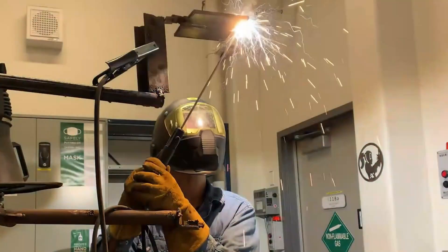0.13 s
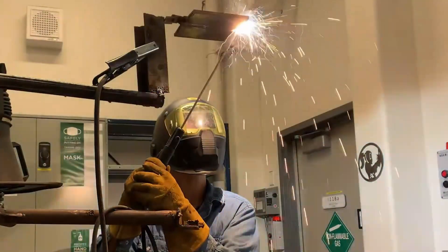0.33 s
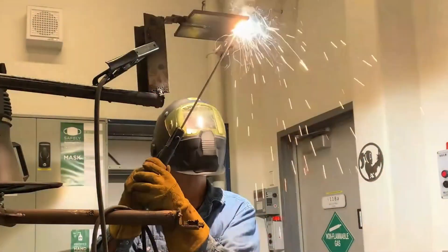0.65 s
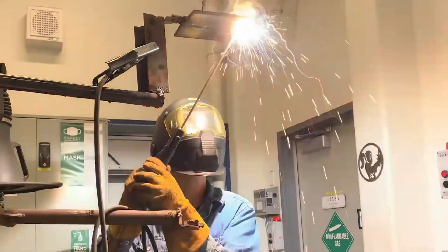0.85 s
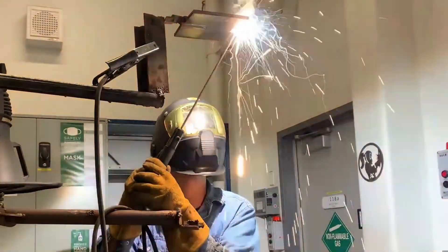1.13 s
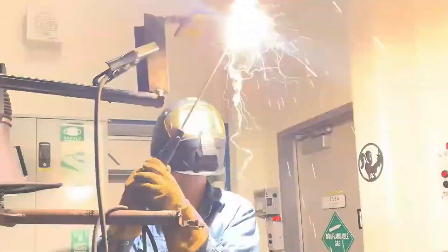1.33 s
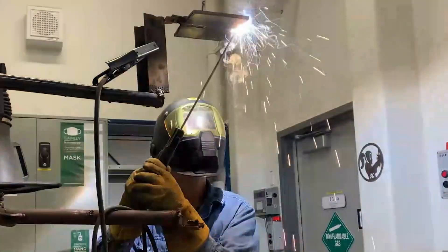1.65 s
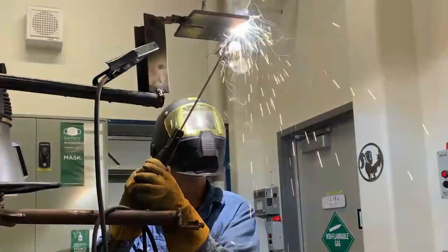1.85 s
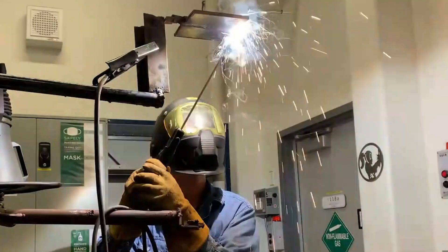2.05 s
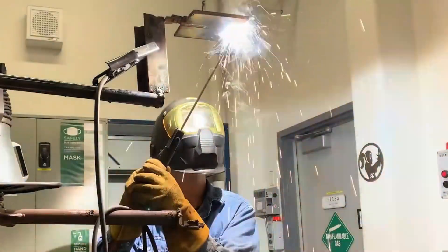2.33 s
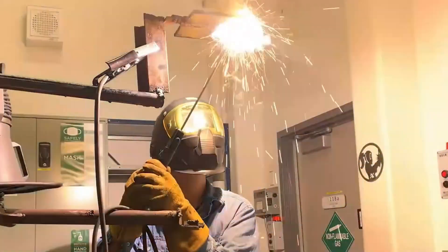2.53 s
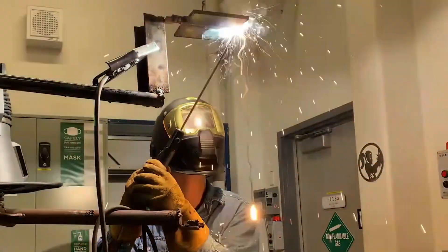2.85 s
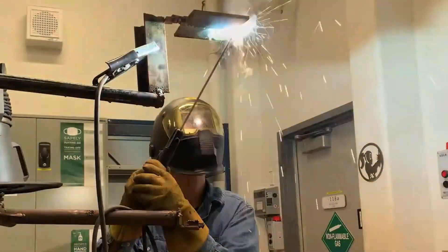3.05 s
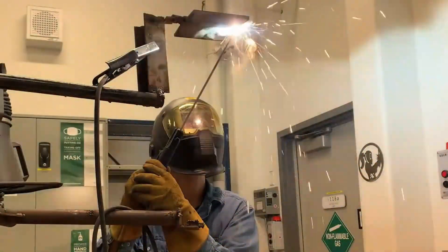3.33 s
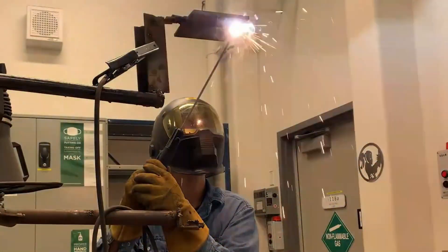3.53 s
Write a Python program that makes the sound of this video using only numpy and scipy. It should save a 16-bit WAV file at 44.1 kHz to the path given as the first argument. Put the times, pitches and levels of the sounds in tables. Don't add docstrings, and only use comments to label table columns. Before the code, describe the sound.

A stick welding arc sizzles throughout with bright crackle and irregular dry snaps. Spatter hisses at 0.4 s, and snaps cluster at 0.8-0.95 s. It thins around 1.2-1.9 s, with duller pops, before a heavy pop rings the steel plate at 2.0 s. Pops and tiny clinks come at 2.6 s, strong hiss at 2.7 s, a brief dip, then a sharp crack at 3.04 s and continued crackling. Short booth echo, low ventilation rumble.

```python
import sys
import numpy as np
from scipy import signal
from scipy.io import wavfile
from scipy.ndimage import uniform_filter1d

SR = 44100
rng = np.random.default_rng(int(sys.argv[2]) if len(sys.argv) > 2 else 0)


def boost(x):
    u = np.asarray(x, float) / 20
    return 10 ** u


def wav_record(signal):
    frames = np.transpose(np.atleast_2d(signal))
    bounded = np.clip(frames, -1, 1)
    quanta = np.round(bounded * 32767).astype(np.int16)
    wavfile.write(sys.argv[1], SR, quanta)


N = 163170


def evened(x):
    return x / np.sqrt(np.mean(x ** 2) + 1e-20)


def read(points, hz):
    f, value = np.transpose(points)
    return np.interp(np.log(hz + 1), np.log(f + 1), value)


def add(mix, s, sound):
    part = mix[round(s * SR):][:len(sound)]
    part += sound[:len(part)]


def colour(points, size=4096):
    hz = abs(np.fft.fftfreq(size, 1 / SR))
    log_gain = np.log(boost(read(points, hz)))
    taps = np.fft.ifft(np.exp(np.conj(signal.hilbert(log_gain)))).real
    return taps / np.linalg.norm(taps)


def coloured(x, points, size=4096):
    return signal.oaconvolve(x, colour(points, size))[:N]


def bands(x):
    split_hz, sheen_hz = 5900, 11140
    low_filter = signal.butter(5, split_hz, fs=SR, output="sos")
    most_filter = signal.butter(5, sheen_hz, fs=SR, output="sos")
    low = signal.sosfiltfilt(low_filter, x)
    most = signal.sosfiltfilt(most_filter, x)
    return np.array([low, most - low, x - most])


def grains(per_s, spread_db):
    size = boost(spread_db * np.minimum(rng.exponential(1, N), 2.2))
    signed = size * rng.choice([-1., 1.], N)
    return evened(signed * (rng.random(N) < per_s / SR))


def strengths():
    # (time [s], fizz level [dB], brightness [dB])
    burning = [(0, -33, -4.5), (.25, -38, -5.5), (.65, -40.5, -8), (.88, -40, 2.5), (1.0, -35, -14),
               (1.35, -37, -10.5), (1.9, -42.5, -10), (2.4, -43.5, -19), (2.59, -40, -8), (2.9, -42, -20),
               (3.016, -44, 3), (3.024, -61, 13), (3.04, -48, -1), (3.07, -38, -12.5), (3.3, -34, -3.5),
               (3.7, -41, -13.5)]
    # (start [s], swell [s], hiss level [dB], plate roar level [dB], brightness [dB])
    sputters = [(0.397, 0.0012, -26, -60, 6), (0.791, 0.0014, -32, -63, 6.5), (0.921, 0.026, -38, -32, -35),
                (1.062, 0.014, -34.5, -51, -14), (1.21, 0.0035, -43.5, -46.5, -13),
                (1.408, 0.0068, -56, -37, -1), (1.544, 0.025, -63, -39.5, -2), (1.994, 0.026, -51, -31, -2),
                (2.248, 0.014, -31.5, -64, -2.5), (2.545, 0.0099, -37.5, -47.5, -29.5),
                (2.599, 0.0024, -36.5, -35, -41), (2.714, 0.05, -21, -35.5, -1.5),
                (2.959, 0.02, -48, -48.5, 1), (3.0408, 0.0018, -26, -48, 8),
                (3.219, 0.0037, -52, -44.5, -1), (3.32, 0.009, -47.5, -75, 28.5),
                (3.572, 0.033, -36, -79, 4)]
    neutral_db = -9.5
    roar_rise_s, roar_t60_s, hiss_t60_s = 0.00056, 0.28, 0.42
    sides = np.array([[-.5], [0.063], [.8]])

    clock, t = np.arange(N) / SR, np.arange(SR // 2) / SR
    s, db, bright_db = np.transpose(burning)
    tilt_db = sides * (np.interp(clock, s, bright_db) - neutral_db)
    power = boost(np.interp(clock, s, db) + tilt_db) ** 2
    roar = np.zeros(N)
    for s, swell, hiss_db, roar_db, bright_db in sputters:
        after = np.maximum(t - swell, 0)
        rise = np.minimum(t / swell, 1)
        for part, side in zip(power, sides):
            hiss = rise * boost(hiss_db + side * bright_db - 60 * after / hiss_t60_s)
            add(part, s, hiss ** 2)
        roar_rise = np.minimum(t / roar_rise_s, 1)
        add(roar, s, roar_rise * boost(roar_db - 60 * after / roar_t60_s))
    return np.sqrt(power), roar


def arc(glow):
    # (pitch [Hz], level [dB])
    fizz_colour = [(900, -9), (1700, -4.5), (3000, -5.5), (4900, 4), (6500, 0.5), (8800, 3.5), (11800, 0),
                   (14500, -3.5)]
    crackles_per_s, crackle_spread_db = 520, 4.5
    crackle_db, crackle_ceiling_db, clump_db = -5, -41, 3
    fizz_db, sway_db = -10, 3

    sway = uniform_filter1d(rng.standard_normal((4, N)), size=900)
    sway = sway / sway.std()
    crackle = np.zeros(N)
    for shape in rng.standard_normal((4, 4)):
        clicks = grains(crackles_per_s / 4, crackle_spread_db)
        crackle += np.convolve(clicks, evened(shape) / 2, "same")
    tamed = np.minimum(boost(crackle_ceiling_db) / np.linalg.norm(glow, axis=0), 1) ** .5
    crackle = boost(crackle_db + clump_db * sway[0]) * tamed * crackle / 2
    noise = bands(coloured(rng.standard_normal(N), fizz_colour))
    fizz = boost(fizz_db + sway_db * sway[1:]) * noise
    return (glow * (fizz + bands(coloured(crackle, fizz_colour)))).sum(0)


def snaps(glow):
    # (time [s], peak level [dB])
    main_snaps = [(0.0176, -20), (0.0354, -20), (0.0467, -20), (0.0613, -15), (0.1316, -15), (0.1501, -20),
                  (0.1594, -20), (0.1987, -16), (0.2085, -17), (0.222, -20), (0.2862, -20), (0.3048, -13),
                  (0.3193, -13), (0.3558, -20), (0.3667, -20), (0.3935, -14), (0.4022, -10), (0.4094, -14),
                  (0.5193, -14), (0.5229, -13), (0.5792, -13), (0.5854, -17), (0.5899, -20), (0.7246, -13),
                  (0.7276, -12), (0.7595, -19),
                  (0.7946, -12), (0.7984, -17), (0.8232, -11), (0.8282, -14), (0.8421, -9), (0.8702, -16),
              (0.882, -14), (0.8847, -13), (0.9207, -11), (0.9343, -12), (0.9498, -14), (1.0754, -18),
              (1.0924, -18), (1.2119, -16), (1.2158, -18), (1.4088, -14), (1.5344, -15), (1.5439, -20),
              (1.5481, -13), (1.7639, -17), (1.8703, -15), (1.9411, -19), (1.999, -14), (2.0042, -15),
              (2.0247, -20), (2.0651, -19),
                  (2.129, -20), (2.175, -25), (2.2437, -15), (2.2538, -14), (2.2598, -11), (2.2724, -11),
            (2.2914, -19), (2.2992, -18), (2.3302, -17), (2.601, -12), (2.607, -13), (2.6125, -19),
            (2.6236, -20), (2.6376, -15), (2.6412, -20), (2.6499, -14), (2.6607, -15), (2.6649, -18),
            (2.6739, -19), (2.6912, -19), (2.6954, -17), (2.7062, -20), (2.7393, -18), (2.7431, -17),
            (2.7484, -20), (2.7588, -16), (2.7649, -18),
                  (2.7681, -17), (2.7747, -15), (2.7775, -16), (2.7922, -11), (2.7955, -15), (2.8017, -20),
            (2.8063, -18), (2.8127, -13), (3.007, -20), (3.0417, -7), (3.0492, -14), (3.065, -13),
            (3.0822, -20), (3.0909, -19), (3.1871, -20), (3.23, -19), (3.2733, -19), (3.2841, -18),
            (3.2936, -15), (3.3204, -14), (3.3347, -11), (3.3643, -15), (3.3739, -20), (3.4481, -15),
            (3.5713, -14), (3.5996, -14)]
    # (time [s], peak level [dB])
    ticks = [(0.0082, -20), (0.0779, -22), (0.0928, -22), (0.1007, -22), (0.1449, -23), (0.1753, -21),
             (0.2593, -22), (0.3608, -24), (0.3968, -22), (0.4755, -24), (0.5263, -21), (0.5322, -23),
             (0.5541, -21), (0.7696, -23), (0.7728, -24), (0.7901, -24), (0.8021, -22), (0.9564, -21),
             (0.9655, -21), (1.0845, -21), (1.0967, -22), (1.2248, -21), (1.2454, -23), (1.2715, -21),
             (1.2911, -24), (1.3284, -21), (1.365, -24), (1.4243, -23), (1.4876, -23), (1.5282, -24),
             (1.7472, -23), (1.7711, -21), (1.7973, -25), (1.834, -26), (2.0442, -23), (2.2673, -21),
             (2.3155, -24), (2.3448, -24), (2.3915, -22), (2.4857, -25), (2.5428, -26), (2.5465, -22),
             (2.5571, -21), (2.5602, -23), (2.9217, -25), (2.9284, -23), (2.9881, -24), (3.0033, -22),
             (3.0187, -23), (3.0739, -21), (3.1294, -23), (3.2616, -22), (3.2801, -22), (3.2983, -21),
             (3.3264, -23), (3.4005, -23), (3.4194, -24), (3.5318, -22), (3.5399, -24), (3.6686, -23)]
    # (pitch [Hz], level [dB])
    snap_colour = [(300, -14.5), (1200, -7.5), (2800, -15), (4900, 1.5), (6300, -5), (8800, 1.5),
                   (12000, -3.5), (15000, -3.5), (16300, -49)]
    spark_share, snap_s, snap_db = 0.23, .0004, -1
    edge_per_db, edge_from_db = .6, -15

    out, t = np.zeros((2, N)), np.arange(256) / SR
    rows = main_snaps + ticks
    sparks = rng.standard_normal((len(rows), 256)) * rng.standard_normal((len(rows), 256))
    crack = t == 0
    bursts = np.sign(sparks[:, :1]) * (crack + spark_share * sparks * np.exp(-(t / snap_s) ** 2))
    parts = bands(signal.lfilter(colour(snap_colour)[:256], [1], bursts))
    for (s, db), part in zip(rows, parts.swapaxes(0, 1)):
        edge = boost([0, 0, edge_per_db * (db - edge_from_db)])
        burst = (glow[:, round((s + .004) * SR)] * edge) @ part
        loud = int(db > edge_from_db)
        add(out[loud], s - .0002, boost(db + snap_db) * burst / abs(burst).max())
    return out


def pops(roar):
    # (time [s], peak level [dB], pitch [Hz])
    blobs = [(0.9303, -34, 870), (0.938, -32, 584), (0.943, -30, 110), (0.9513, -18.5, 1020),
             (0.9607, -27, 900), (1.3285, -29.5, 980), (1.386, -30, 1210), (1.4088, -23.5, 1160),
             (1.5482, -20.5, 1160), (1.5542, -28, 710), (1.557, -25.5, 283), (1.78, -29, 1290),
             (1.9952, -20, 1390), (1.9968, -27, 1400), (1.9994, -15.5, 1410), (1.9996, -12.5, 1400),
             (2.004, -1.5, 1270), (2.0066, -20.5, 1080), (2.0105, -14, 1400), (2.0138, -15, 684),
             (2.015, -13, 1490), (2.0436, -16, 1900), (2.064, -20, 1830), (2.4472, -38.5, 490),
             (2.5465, -21, 1500), (2.5942, -21, 1510), (2.6014, -13, 1470), (2.6026, -10, 1500),
             (2.6061, -15.5, 1220), (2.6085, -13, 1130), (2.707, -22.5, 930), (2.7483, -19, 1200),
             (2.761, -23, 1200), (2.774, -28, 1000), (2.7877, -19.5, 1200), (2.7916, -21.5, 1190),
             (3.2245, -25.5, 700), (3.229, -29.5, 290)]
    # (pitch [Hz], level [dB])
    roar_colour = [(120, -14), (400, 1), (800, -3), (1400, -1), (2300, -7.5), (3500, -7.5), (6000, -20)]
    lead_s, rise, fall = 0.0012, 0.51, 0.57
    thump_db, thump_hz = -10, 114
    rattles_per_s, ring_db, rattle_ring_db = 1100, -17, -16

    out, t = np.zeros(N), np.arange(2048) / SR
    thump = np.sin(2 * np.pi * thump_hz * t) * np.hanning(2048) * np.exp(-t * thump_hz / 0.36) * 8
    for s, db, hz in blobs:
        turns = (t - lead_s) * hz
        width = np.where(turns < 0, rise, fall)
        push = np.sin(2 * np.pi * turns) * np.exp(-(turns / width) ** 2)
        add(out, s - lead_s, boost(db - 1.0) * (push + boost(thump_db) * thump))
    rattle = roar * coloured(grains(rattles_per_s, 6.5), roar_colour)
    return out + rattle + plate(boost(ring_db) * out + boost(rattle_ring_db) * rattle)


def plate(x):
    # (pitch [Hz], level [dB], time to fade by 60 dB [s])
    tones = [(380.6, -2, 0.53), (474.4, 6.5, 0.12), (644, 16, 0.039), (688, 3, 0.33), (1080, -2.5, 0.21),
             (1214, 8, 0.2), (1305, 9, 0.063), (1497, 7, 0.067), (1755, 3, 0.14), (1866, 9, 0.2),
             (2030, 4, 0.13), (2150, 11, 0.075), (2260, 3, 0.18), (2950, 6, 0.3)]
    t = np.arange(SR // 2) / SR
    ring = sum(boost(db - 60 * t / t60) * np.sin(2 * np.pi * hz * t) for hz, db, t60 in tones)
    return signal.oaconvolve(x, ring / np.linalg.norm(ring))[:N]


def clinks():
    # (time [s], peak level [dB])
    dull_rings = [
        (1.2119, -44),
        (1.9955, -24),
        (2.6008, -12.5),
        (2.603, -25),
        (2.6058, -15),
        (2.6069, -24),
        (2.6378, -23),
        (2.6499, -13),
    ]
    clink_hz, t60_s = 4400, 0.0038
    out, t = np.zeros(N), np.arange(512) / SR
    for s, db in dull_rings:
        add(out, s, boost(db - 60 * t / t60_s) * np.sin(2 * np.pi * clink_hz * t))
    return out


def booth(x):
    # (pitch [Hz], time to fade by 60 dB [s])
    fading = [(200, 0.11), (1500, 0.56), (5000, 0.22), (14000, 0.12)]
    first_echo_s, gap = 0.0031, 20
    taps = np.zeros(SR // 2)
    at = np.arange(round(first_echo_s * SR), SR // 2 - gap, gap)
    at = at + rng.integers(0, gap, len(at))
    taps[at] = rng.choice([-1., 1.], len(at))
    hz, t, z = signal.stft(taps, SR, nperseg=256)
    fade = boost(-60 * t / read(fading, hz)[:, None])
    tail = signal.istft(z * fade, SR, nperseg=256)[1]
    return signal.fftconvolve(x, tail / np.linalg.norm(tail))[:N]


def air():
    # (pitch [Hz], level [dB])
    air_colour = [(8.8, -2), (15, 17), (42, -1.5), (155, -14.5), (855, -18), (1080, -13.5), (2280, -20.5),
                  (4000, -20), (5200, -41), (8800, -120)]
    air_db = -46
    sway = boost(0.5 * evened(uniform_filter1d(rng.standard_normal(N), size=6000)))
    rumble = evened(coloured(rng.standard_normal(N), air_colour, size=16384))
    return boost(air_db) * sway * rumble


def scene():
    booth_db, top_hz, snap_top_hz = -12.5, 15600, 16300
    glow, roar = strengths()
    small, cracks = snaps(glow)
    rest = small + arc(glow) + pops(roar) + clinks()
    soft = rest + boost(booth_db) * booth(rest + cracks) + air()
    crack_filter = signal.firwin(81, snap_top_hz, window=("kaiser", 7), fs=SR)
    soft_filter = signal.firwin(255, top_hz, window=("kaiser", 9), fs=SR)
    cracks = np.convolve(cracks, crack_filter, "same")
    return (cracks + signal.oaconvolve(soft, soft_filter, "same"))[None]


def band_limit(x):
    return signal.sosfilt(signal.butter(12, 17040, fs=SR, output="sos"), x)


def record(dry):
    return band_limit(dry)


dry = scene()
out = record(dry)
wav_record(out)
```